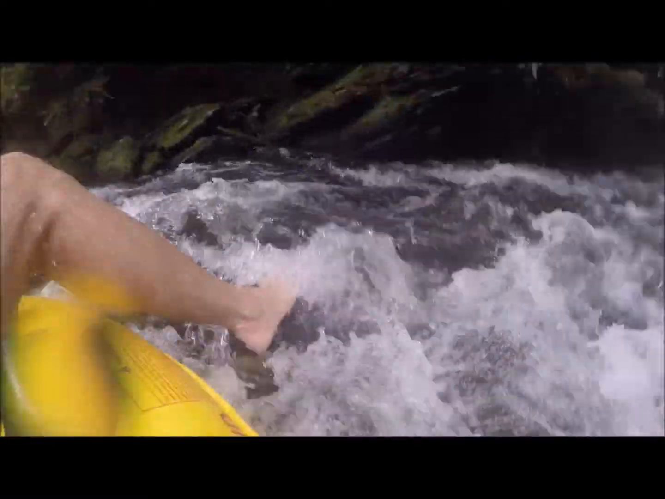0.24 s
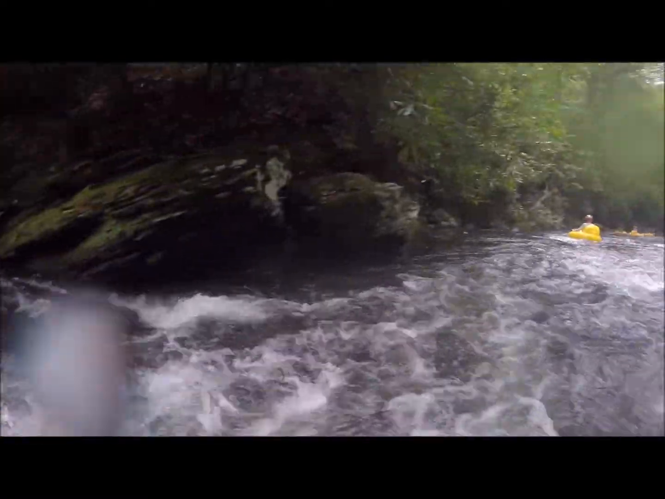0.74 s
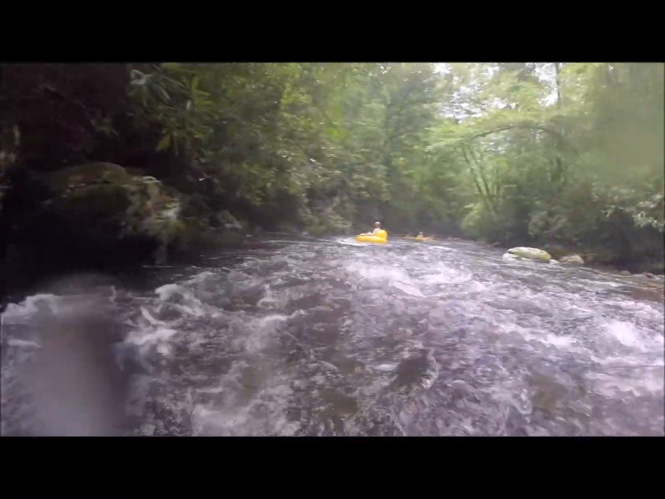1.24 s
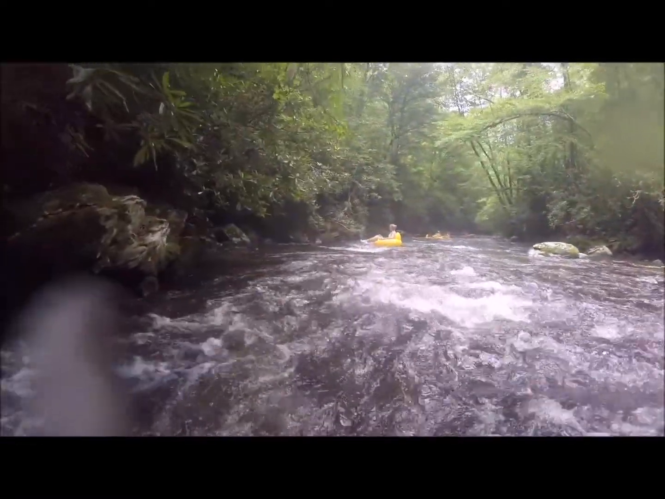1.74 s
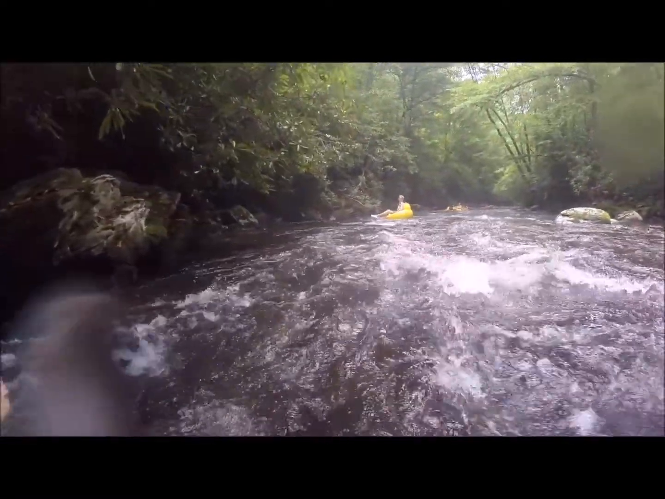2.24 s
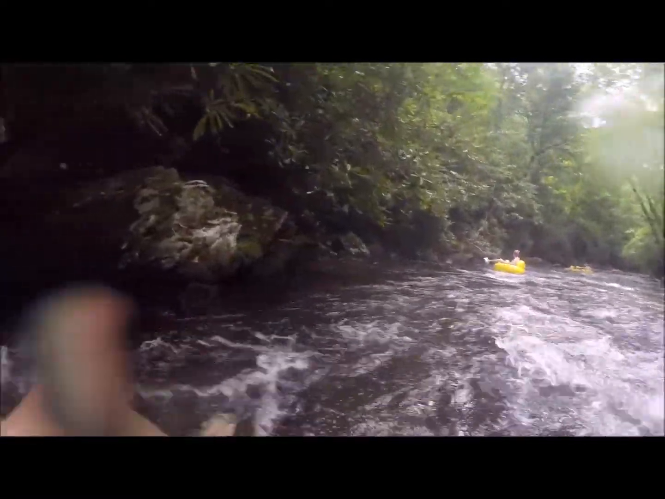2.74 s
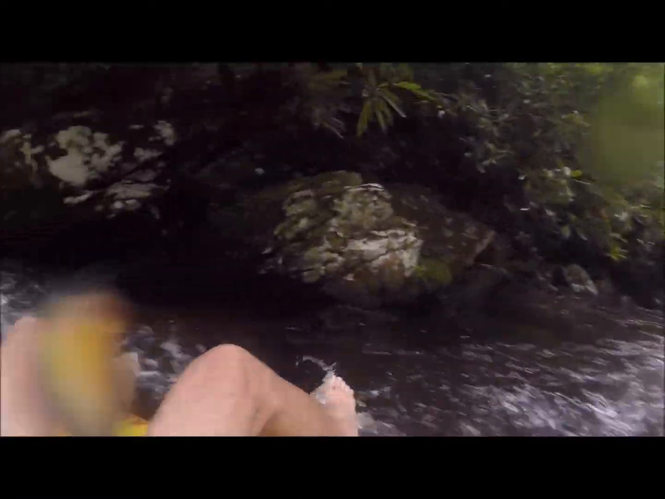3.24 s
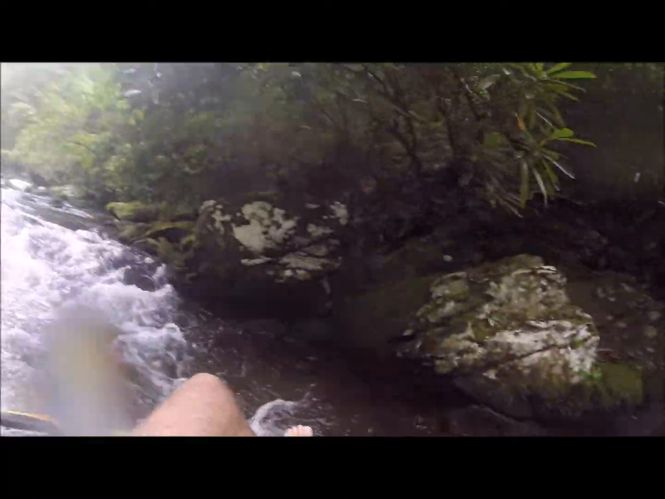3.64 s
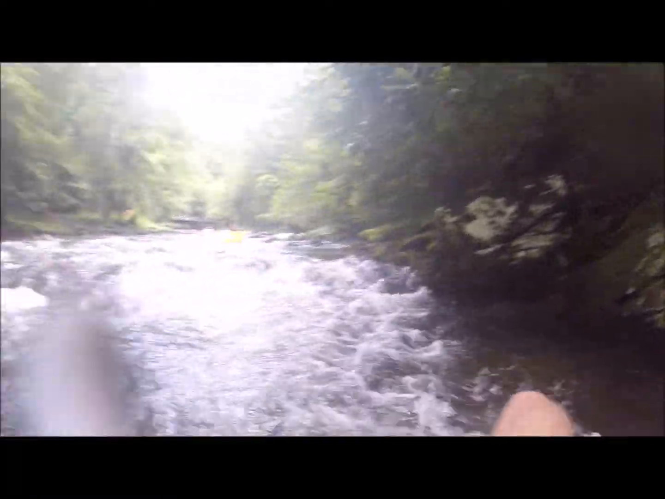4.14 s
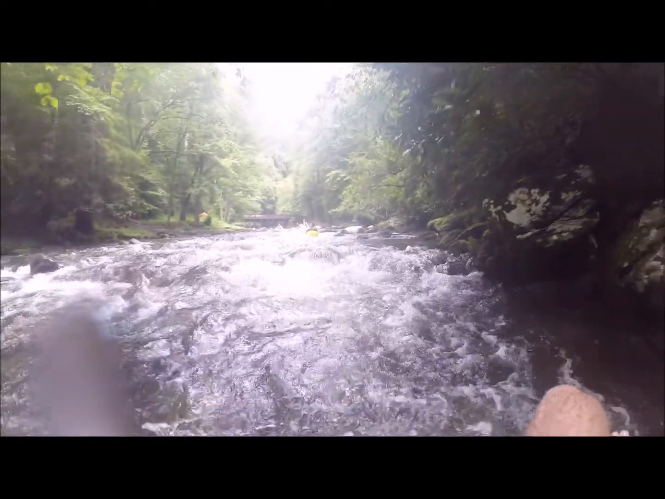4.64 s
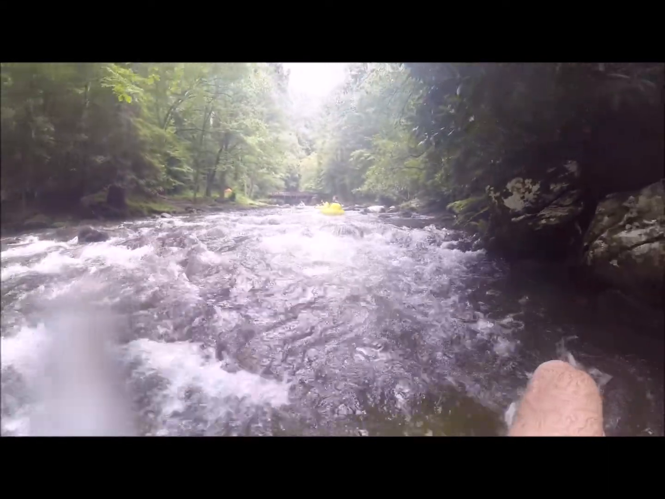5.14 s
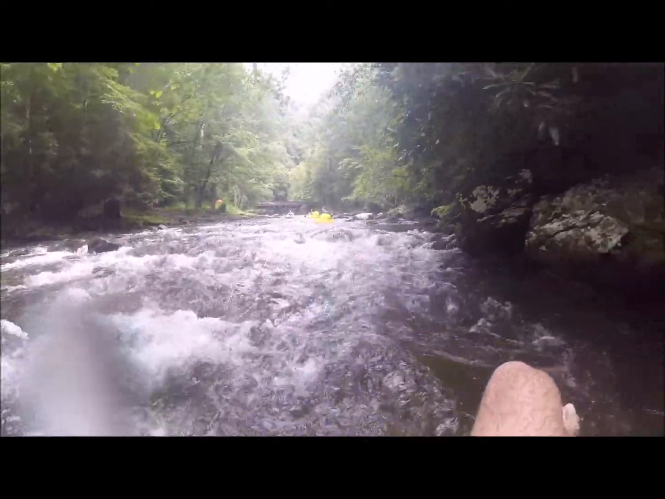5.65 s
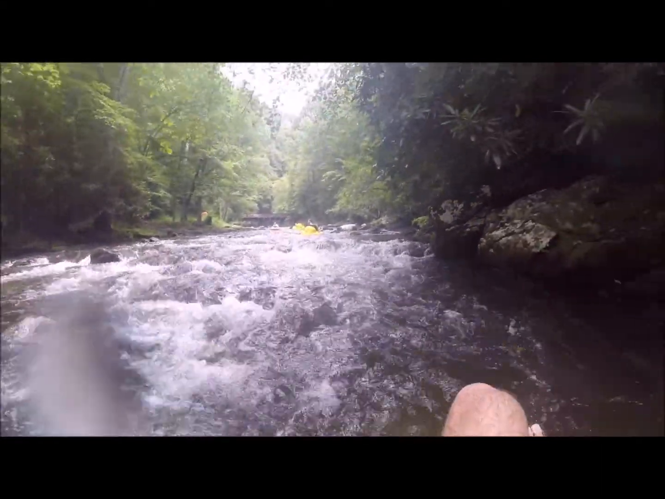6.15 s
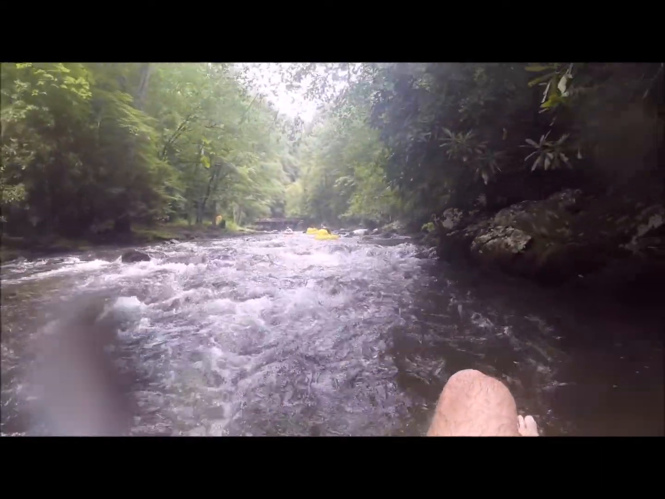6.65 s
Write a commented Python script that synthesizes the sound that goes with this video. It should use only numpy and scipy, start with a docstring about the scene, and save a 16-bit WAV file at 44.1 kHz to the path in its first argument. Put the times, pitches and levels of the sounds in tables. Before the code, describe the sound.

Foamy rapids rush past with close splashes and soft slaps, a single loud click against the microphone's case, then a gradually quieter choppy run.

```python
"""A mountain creek in whitewater, heard from a microphone in a waterproof case on a floating tube.
Foam hiss, ringing bubbles and bursting droplets rush all around, first in a breaking wave, then in a choppy run.
Close to the case, noise bursts make splashes, sinking tones make waves slapping the tube, and low noise the buffeting.
One sharp knock rings the case and overloads the microphone; the gain control ducks the creek for almost a second."""
import sys
import numpy as np
from scipy import signal
from scipy.fft import rfft, irfft
from scipy.io import wavfile
from scipy.ndimage import uniform_filter1d, minimum_filter1d

SR = 44100
rng = np.random.default_rng(int(sys.argv[2]) if len(sys.argv) > 2 else 0)


def bounce(signal):
    """Save signal as a 16-bit WAV file at the path given by the first command-line argument."""
    frames = np.transpose(np.atleast_2d(signal))
    limited = np.clip(frames, -1, 1)
    pcm = np.round(limited * 32767).astype(np.int16)
    wavfile.write(sys.argv[1], SR, pcm)


N = 304290
TIME = np.arange(N) / SR  # seconds

# spectrum of the water through the case, in the choppy run below the wave: f/Hz, relative density/dB
RUN_SPECTRUM = [(59, -29), (100, -0.5), (232, -3), (368, -3.5), (610, -6.5), (1510, -5), (1640, -4),
                (2020, -4.5), (2710, -1.5), (4220, -11.5), (4780, -7), (6030, -4.5), (6840, -15.5),
                (9570, -18), (15200, -33.5)]


def gain_of(db):
    """Decibels to gain."""
    return 10 ** (np.asarray(db) / 20)


def evened(x):
    """Scales to rms 1."""
    return x / np.sqrt(np.mean(x ** 2) + 1e-20)


def colour(points, hz):
    """Gain at hz of a spectrum given as (Hz, dB) points, joined along log frequency."""
    f, db = np.transpose(points)
    return gain_of(np.interp(np.log(hz + 1), np.log(f + 1), db))


def filtered(x, response):
    """Filters x by a gain that is a function of frequency."""
    hz = np.fft.rfftfreq(len(x), 1 / SR)
    return irfft(rfft(x) * response(hz), len(x))


def between(x, low_hz, high_hz):
    """The part of x between two frequencies."""
    return filtered(x, lambda hz: (hz >= low_hz) & (hz < high_hz))


def add(mix, s, sound):
    """Mixes a sound in at s seconds, cut off at the end of the mix."""
    part = mix[round(s * SR):][:len(sound)]
    part += sound[:len(part)]


def foam(patchy_db, flicker_db):
    """Countless far bubbles merge into a hiss that swells in patches and flickers as crests break."""
    hiss = signal.stft(rng.standard_normal(N), nperseg=256, noverlap=192)[2]
    # patches are smooth in time and pitch; the flicker moves all pitches together
    patches = uniform_filter1d(rng.standard_normal(hiss.shape), size=30, axis=1)
    patches = uniform_filter1d(patches, size=5, axis=0)
    flicker = uniform_filter1d(rng.standard_normal(hiss.shape[1]), size=12)
    hiss = hiss * gain_of(patchy_db * evened(patches) + flicker_db * evened(flicker))
    return evened(signal.istft(hiss, nperseg=256, noverlap=192)[1][:N])


def bubbles(per_s, low_hz, high_hz, cycles, rise, spread_db, count=36):
    """Bubbles of many sizes ring for a few cycles, rising in pitch as they near the surface."""
    out = np.zeros(N)
    pitches = np.geomspace(low_hz, high_hz, count)
    for hz in pitches:
        age = np.arange(0, 6, hz / (cycles * SR))  # in decay times
        turns = cycles * age * (1 + rise * age)
        ring = np.exp(-age) * np.sin(2 * np.pi * turns)
        born = rng.random(N) < per_s * hz / pitches.sum() / SR  # small ones are the most common
        excess = np.minimum(rng.standard_exponential(N)[born], 4)
        pops = np.zeros(N)
        pops[born] = gain_of(spread_db * excess)
        out += signal.oaconvolve(pops, ring / np.linalg.norm(ring))[:N]
    return evened(out - out.mean())


def rapids():
    """Foam, bubbles and droplets; rush and spray swell as the tube drifts past, and the churn follows the rush."""
    # spectrum of the water through the case, inside the breaking wave: f/Hz, relative density/dB
    wave_spectrum = [(120, -3), (200, -6.5), (298, -3.5), (420, -5), (452, -4), (552, -5), (1490, -5.5),
                     (1730, -3.5), (2920, -1), (3500, -10.5), (4120, -12), (6030, -3), (7100, -16.5),
                     (12000, -23), (15200, -34)]
    # water along the ride, before the trims: t/s, rush of foam level/dB, spray level/dB
    flow = [(0.0, -44, -47), (0.2, -40.5, -42.0), (0.42, -45.0, -48), (0.85, -43.5, -49.5),
            (1.3, -49, -54.5), (2.15, -50, -53.5), (2.35, -48.5, -52.5), (2.68, -51.0, -54),
            (2.98, -49.5, -52.5), (3.3, -49.5, -54), (3.66, -46.0, -54.0), (4.1, -50.5, -55),
            (4.5, -50.0, -53.0), (4.75, -50.0, -55), (5.42, -50.5, -52.5), (5.8, -52.5, -55.5),
            (6.9, -53, -57.5)]
    rush_trim_db, spray_trim_db = 0.33, 0.13
    churn_mean_db, churn_follows = -53.5, 0.54  # share of the rush's swells that the churn follows

    ringing = bubbles(per_s=2800, low_hz=705, high_hz=7050, cycles=9.4, rise=0.016, spread_db=4.0)
    droplets = bubbles(per_s=350, low_hz=3670, high_hz=13200, cycles=1.1, rise=.01, spread_db=6.5)
    water = foam(patchy_db=1.13, flicker_db=0.55)
    water = water + gain_of(-11.5) * ringing + gain_of(-13.0) * droplets

    in_wave = np.interp(TIME, [1.2, 2.1], [1, 0])  # the tube leaves the breaking wave behind
    near = filtered(water, lambda hz: colour(wave_spectrum, hz))
    below = filtered(water, lambda hz: colour(RUN_SPECTRUM, hz))
    water = in_wave * near + (1 - in_wave) * below

    s, *levels_db = np.transpose(flow)
    rush_db, spray_db = (np.interp(TIME, s, db) for db in levels_db)
    churn_db = churn_mean_db + churn_follows * (rush_db - rush_db.mean())
    churn = evened(between(water, 60, 1300)) * gain_of(churn_db)
    rush = evened(between(water, 1300, 4000)) * gain_of(rush_db + rush_trim_db)
    spray = evened(between(water, 4000, SR)) * gain_of(spray_db + spray_trim_db)
    return churn + rush + spray


def buffeting():
    """Air and the rocking ride push on the case: a lumpy rumble."""
    # spectrum of the rumble: f/Hz, relative density/dB
    rumble_spectrum = [(4, 2), (12, -0.5), (22, 2), (42, -9.5), (70, -14.5), (110, -26), (200, -30),
                       (600, -100)]
    # how hard the ride rocks the case, before the trim: t/s, level/dB
    rocking = [(0.0, -57), (0.2, -52.5), (0.5, -50.5), (1.15, -52), (2.1, -51.5), (2.24, -44),
               (2.42, -50.5), (2.9, -49), (3.2, -53), (3.55, -47), (4.1, -47), (5.05, -59.5), (5.6, -54.5),
               (6.2, -54.5), (6.5, -49.0), (6.9, -53.5)]
    trim_db = 4
    s, db = np.transpose(rocking)
    rumble = evened(filtered(rng.standard_normal(N), lambda hz: colour(rumble_spectrum, hz)))
    return rumble * gain_of(trim_db + np.interp(TIME, s, db))


def splashes():
    """Near splashes are short bursts of spray; big ones sound low and linger, fine ones are high and brief."""
    # splashes close to the case, and one low burst at 0.140 s that rings over the first wave's slap: t/s,
    # starting level/dB, centre f/Hz, spread/octaves
    near_splashes = [(0.04, -35, 4500, 0.93), (0.044, -43.5, 790, .3), (0.140, -46.5, 525, 0.12),
                     (0.209, -36, 5500, 0.88), (0.593, -37, 4500, 1.5), (0.657, -38, 7000, .9),
                     (0.809, -36, 7000, 1.7), (0.833, -37, 3500, 2.7), (2.024, -49, 12000, .3),
                     (2.442, -52, 12000, 0.26), (2.472, -40, 5700, 0.17), (2.493, -38.5, 6100, .26),
                     (3.466, -42, 2900, .2), (4.437, -41.5, 6000, 0.89), (4.612, -44, 3070, 0.23)]
    usual_decay_s, usual_hz, size_law = 0.0041, 5000, 0.65  # lower ones last longer by this power
    out, t = np.zeros(N), np.arange(SR // 10) / SR
    for s, db, centre_hz, octaves in near_splashes:
        def response(hz):
            off_centre = np.log2((hz + 1) / centre_hz) / octaves
            return colour(RUN_SPECTRUM, hz) * np.exp(-.5 * off_centre ** 2)
        burst = evened(filtered(rng.standard_normal(len(t)), response))
        decay_s = usual_decay_s * (usual_hz / centre_hz) ** size_law
        add(out, s, gain_of(db) * burst * np.exp(-t / decay_s))
    return out


def slaps():
    """The air-filled tube answers each wave with a soft thump that sinks in pitch as its skin relaxes."""
    # waves slapping the tube: t/s, peak level of the swell/dB, starting f/Hz, rise and decay time/s
    wave_slaps = [(0.131, -38, 200, .008), (2.188, -47, 88, .013), (5.967, -49, 92, .013),
                  (6.305, -49, 91, .013)]
    out, t = np.zeros(N), np.arange(SR // 5) / SR
    for s, db, hz, decay_s in wave_slaps:
        turns = np.cumsum(hz * np.exp(-t / .11)) / SR
        swell = t / decay_s * np.exp(1 - t / decay_s)
        add(out, s, gain_of(db) * swell * np.sin(2 * np.pi * turns))
    return out


def dipped(x):
    """The level dips briefly now and then, most in the treble and not in the bass."""
    # brief dips: t/s, depth in the treble/dB
    dips = [(0.142, 12), (0.569, 12), (0.908, 11), (0.975, 11), (1.038, 12), (1.124, 12), (1.955, 13),
            (2.044, 12), (3.705, 13), (4.300, 22), (5.923, 14), (6.543, 16)]
    length_s, middle_spared_db = 0.016, 13  # the middle sinks this much less than the treble
    s, treble_db = np.transpose(dips)
    middle_db = np.maximum(treble_db - middle_spared_db, 0)
    shape = np.exp(-(2 * (TIME[:, None] - s) / length_s) ** 4)  # one flat-topped bump a dip
    bass = between(x, 0, 400)
    middle = between(x, 400, 3400) + between(x, 5300, 6500)  # the two humps of the case's response
    treble = x - bass - middle
    return bass + middle * gain_of(-shape @ middle_db) + treble * gain_of(-shape @ treble_db)


def knock(level_db, push_db, push_s, contact_hz, leak_hz):
    """A blow squeezes the air in the case and rings its shell; the pressure swings back as it leaks."""
    # what the case rings with: f/Hz, relative starting level/dB, time to fall by 60 dB/s
    case_rings = [(760, -15.8, 0.0033), (1580, -2.0, 0.0069), (2100, -25.0, 0.0263), (2220, -34.9, 0.0534),
                  (2740, -17.3, 0.0148), (3130, -13.1, 0.0087), (3570, -11.9, 0.0062),
                  (4620, -43.2, 0.0348), (5300, -10.5, 0.0053), (7280, -29.2, 0.0076), (9460, -8.4, 0.0019),
                  (12920, -22.4, 0.0033)]
    knock_s, rattle_db, rattle_s = 1.3316, -32.5, .0055  # start; relative level and decay of the shiver
    t = np.arange(SR // 4) / SR
    shell = sum(gain_of(db - 60 * t / t60) * np.cos(2 * np.pi * hz * t) for hz, db, t60 in case_rings)
    pressure = -(gain_of(push_db) * np.exp(-t / push_s) + shell)
    pressure = signal.lfilter(*signal.butter(2, contact_hz, fs=SR), pressure)  # a hard, brief contact

    # the mount shivers
    shiver = filtered(rng.standard_normal(len(t)), lambda hz: colour(RUN_SPECTRUM, hz) / (1 + hz / 3000))
    pressure = pressure + gain_of(rattle_db) * evened(shiver) * np.exp(-t / rattle_s)

    leak = signal.butter(1, leak_hz, "high", fs=SR)
    leaked = signal.lfilter(*leak, signal.lfilter(*leak, pressure))
    out = np.zeros(N)
    add(out, knock_s, gain_of(level_db) * leaked)
    return out


def scene():
    """The creek around the tube, and the knock on the case."""
    creek = dipped(rapids() + splashes()) + slaps() + buffeting()
    blow = knock(level_db=18, push_db=-2.4, push_s=.0018, contact_hz=9500, leak_hz=13.7)
    return (creek + blow)[None]


def gain_control(x, threshold_db, share, recovery_db_per_s):
    """Looks a little ahead, turns down at once for a loud peak and recovers slowly."""
    power = abs(uniform_filter1d((x ** 2).mean(0), size=64))
    power_db = 10 * np.log10(power + 1e-12)
    cut_db = share * np.maximum(power_db - threshold_db, 0)
    cut_db = -minimum_filter1d(-cut_db, size=1260)  # reaches 14 ms either way
    fall = recovery_db_per_s * TIME
    cut_db = np.maximum.accumulate(cut_db + fall) - fall
    return x * gain_of(-uniform_filter1d(cut_db, size=48))


def record(dry):
    """Microphone chain: gain control, overload just under full scale, then the band limit."""
    loud = gain_control(dry, threshold_db=-23.0, share=0.44, recovery_db_per_s=18.0)
    loud = np.clip(loud, -.93, .93)
    lowpass = signal.firwin(1023, 15300, window=("kaiser", 9), fs=SR)  # edge in Hz
    return signal.oaconvolve(loud, lowpass[None], "same")


dry = scene()
out = record(dry)
bounce(out)
```